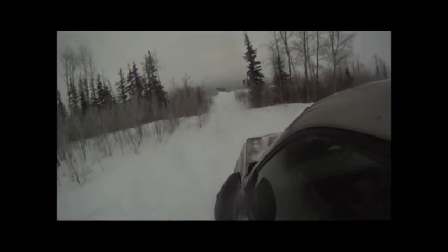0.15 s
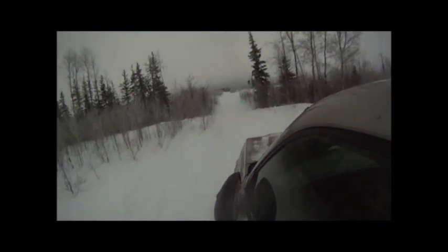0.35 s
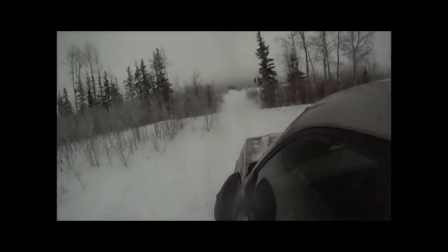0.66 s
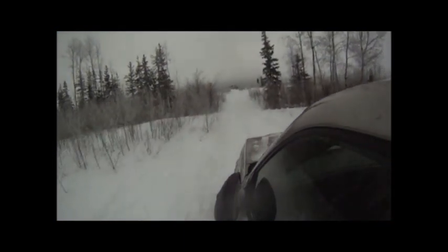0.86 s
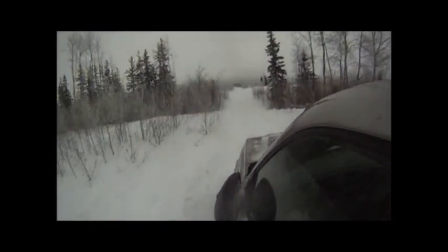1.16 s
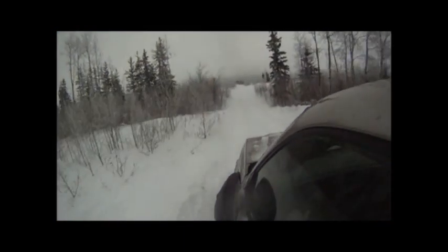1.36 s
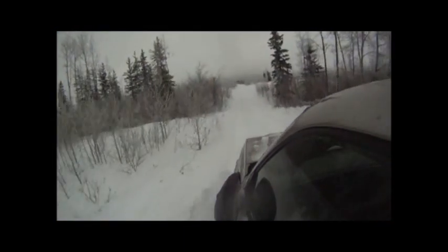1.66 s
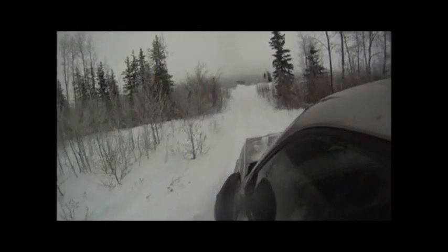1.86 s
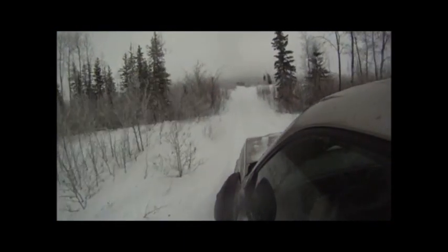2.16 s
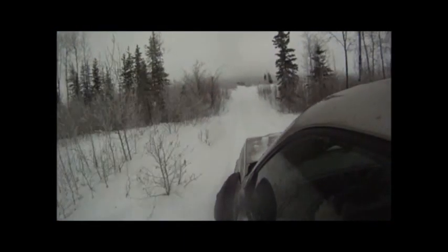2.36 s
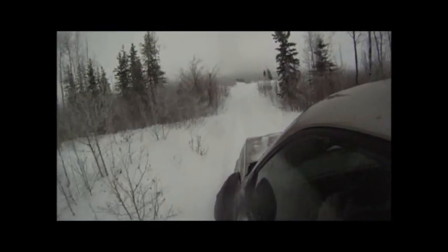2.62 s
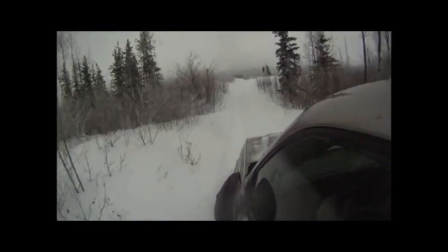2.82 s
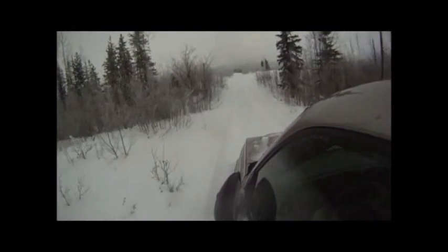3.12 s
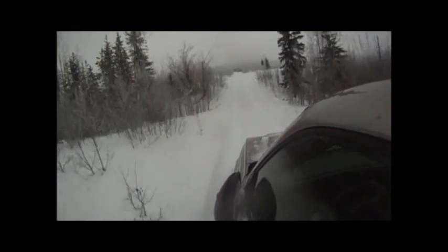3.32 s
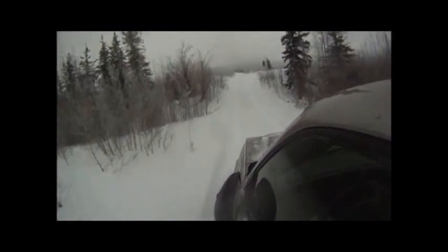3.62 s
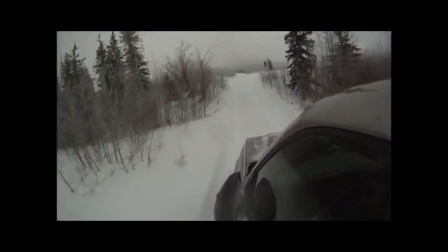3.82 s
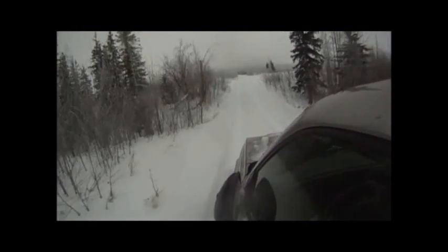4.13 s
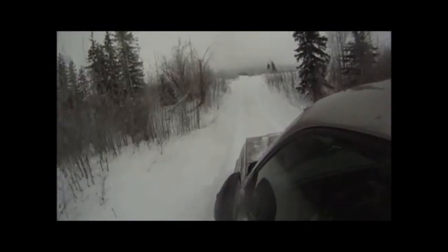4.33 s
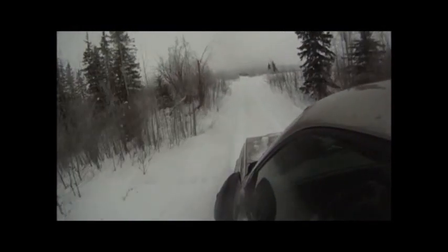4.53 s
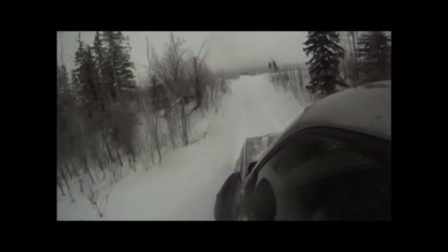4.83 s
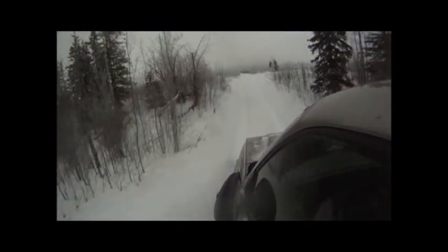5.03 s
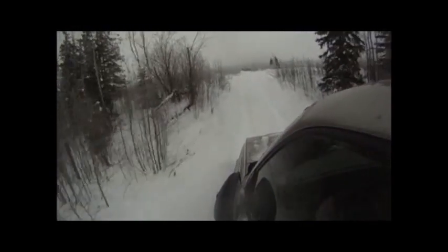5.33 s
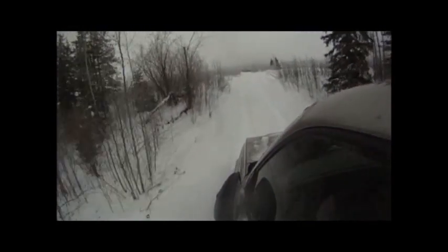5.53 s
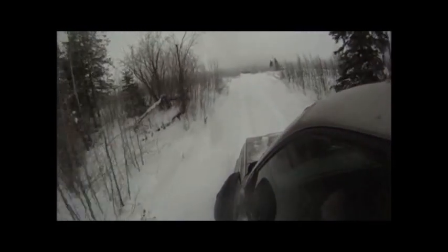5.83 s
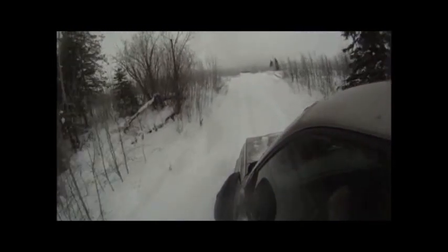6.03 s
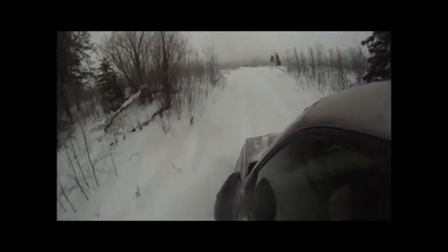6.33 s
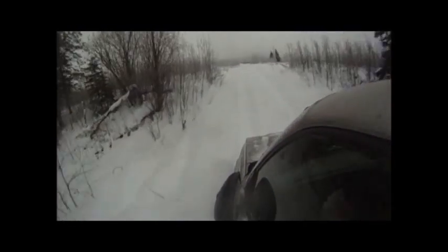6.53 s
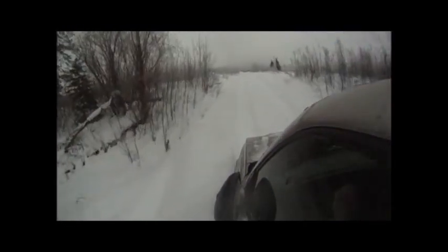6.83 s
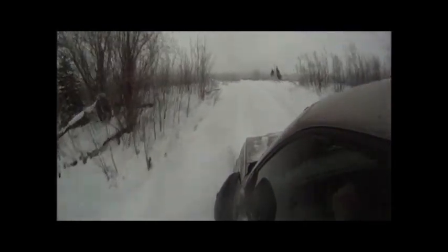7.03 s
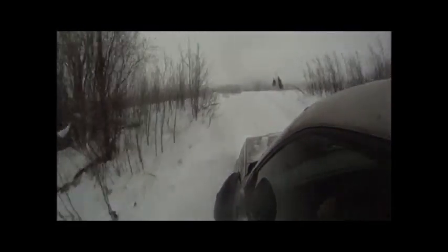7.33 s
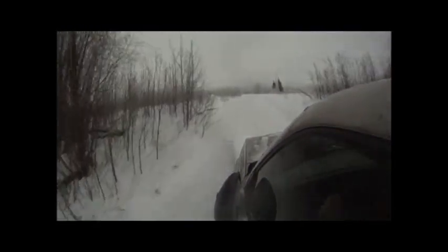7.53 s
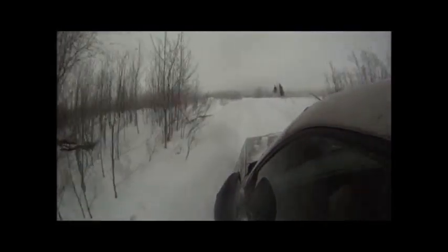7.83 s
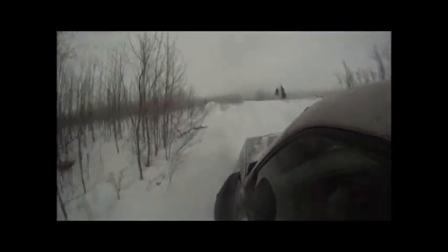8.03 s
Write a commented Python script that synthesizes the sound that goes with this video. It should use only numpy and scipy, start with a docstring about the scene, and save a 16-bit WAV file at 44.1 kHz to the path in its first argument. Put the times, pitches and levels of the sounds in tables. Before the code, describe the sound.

A tracked pickup rumbles through snow with a low pulsing drone, light clicks and wiper knocks, and bursts of close plastic rattling.

```python
"""A pickup on rubber tracks drives along a snowy trail, heard from a closed camera case on its side.
From the start the track lugs drum at a rate that follows the speed, the body rumbles, snow hisses and
crunches, and the drive whines faintly. Until 3.5 s the wipers knock through three sweeps, among sharp
clicks and short pings; then a loose part pings. After 6 s a wheel squeals thinly twice. Bumps set the
case buzzing in its mount along the way, hardest after 7 s, as the truck reaches its highest speed."""
import sys
import numpy as np
from scipy import signal
from scipy.fft import rfft, irfft, next_fast_len
from scipy.io import wavfile

SR = 44100
rng = np.random.default_rng(int(sys.argv[2]) if len(sys.argv) > 2 else 0)


def store_pcm(level_fs):
    """Save levels as 16-bit WAV."""
    pcm = np.round(np.clip(level_fs, -1, 1) * 32767).astype(np.int16)
    wavfile.write(sys.argv[1], SR, np.atleast_2d(pcm).T)


N = 360297

# roughness of the ride: t/s, then relative level/dB of chassis rumble, panel boom and snow hiss
RIDE = [(0, -36, -47.5, -62.5), (.45, -43, -44, -64.5), (1.0, -39.5, -43.5, -61.5),
        (1.3, -36.5, -43.5, -63), (1.7, -39.5, -46, -64), (2.2, -37.5, -43, -63), (3.05, -40, -46.5, -64.5),
        (3.4, -40.5, -43.5, -61.5), (4.3, -39.5, -40.5, -61.5), (5.1, -44.5, -42, -63),
        (5.65, -42, -40, -62), (6.1, -45.5, -42.5, -62), (6.6, -36, -45, -61.5), (7.2, -39.5, -46, -60),
        (7.8, -35.5, -41.5, -57.4), (8.17, -37.5, -44, -59)]
# bumps that set the case buzzing: start t/s, duration/s (0 is one throw), tick level/dB
BUMPS = [(.04, 0.014, -51.5), (.0994, 0, -44), (.1395, 0.017, -53), (0.9667, 0.013, -38.5),
         (1.031, 0.052, -40.5), (1.0633, 0.082, -37), (1.1455, 0.0068, -36), (1.1914, 0.022, -41),
         (2.181, 0.1, -48.5), (2.2954, 0, -53), (3.421, .04, -55), (3.5541, 0.098, -47.5),
         (3.879, .16, -53.5), (4.278, 0.013, -44), (4.349, 0.16, -47.5), (4.5439, 0.013, -52),
         (6.4663, 0.0012, -53), (7.1645, 0.014, -31), (7.2112, 0.0071, -32), (7.391, 0.015, -46),
         (7.4138, .015, -40.5), (7.445, 0.014, -32), (7.462, 0.018, -40), (7.528, 0.0025, -33.5),
         (7.538, 0.021, -39.5), (7.572, 0.026, -40), (7.608, 0.022, -36.5), (7.646, .05, -33),
         (7.7362, 0.011, -39), (7.762, 0.068, -42), (7.8125, 0.07, -33.5), (7.9209, 0.0028, -35),
         (8.0339, 0.0094, -42)]


def from_db(db):
    """Amplitude ratio of a level in decibels."""
    return 10 ** (np.asarray(db) / 20)


def rms_one(x):
    """Normalisation to unit rms."""
    return x / np.sqrt(np.mean(x ** 2) + 1e-20)


def in_time(rows):
    """Linear interpolation of each column after t/s, sample by sample."""
    s, *columns = np.transpose(rows)
    return [np.interp(np.arange(N) / SR, s, c) for c in columns]


def swell_db(start, length, rise_db_per_s, fall_db_per_s):
    """Exponential growth to 0 dB at the start, a hold, then exponential decay."""
    end = start + max(length, 0)
    return np.interp(np.arange(N) / SR, [start - 10, start, end, end + 10],
                     [-10 * rise_db_per_s, 0, 0, -10 * fall_db_per_s])


def drift(rate_hz):
    """Random modulation: low-pass noise of unit rms."""
    r = np.exp(-80 * np.pi * rate_hz / SR)
    slow = signal.lfilter([1], [1, -2 * r, r * r], rng.standard_normal(N // 40 + 2002))[2000:]
    return np.interp(np.arange(N) / 40, np.arange(len(slow)), rms_one(slow))


def unsteady_tone(hz, db, jitter, waver_db):
    """A sinusoid under random frequency and amplitude modulation."""
    phase = 2 * np.pi * np.cumsum(hz * (1 + jitter * drift(59.5))) / SR
    return from_db(db + waver_db * drift(16)) * np.sin(phase)


def coloured(x, gain_at):
    """Spectral shaping by a gain that depends on frequency; unit rms."""
    size = next_fast_len(N)
    hz = np.maximum(np.arange(size // 2 + 1) * SR / size, 1)
    return rms_one(irfft(rfft(x, size) * gain_at(hz), size)[:N])


def bell(hz, centre_hz, half_width_hz):
    """A resonance curve of height 1."""
    return 1 / (1 + ((hz - centre_hz) / half_width_hz) ** 2)


def ring(force, hz, t60):
    """A damped oscillator: a unit impulse starts a sine that loses 60 dB in t60 seconds."""
    r, w = from_db(-60 / (t60 * SR)), 2 * np.pi * hz / SR
    return signal.lfilter([0, np.sin(w)], [1, -2 * r * np.cos(w), r * r], force + 1e-18)


def clicks(rows):
    """Impulsive forces, one for each row of t/s, level/dB."""
    force = np.zeros(N)
    for s, db in rows:
        force[int(np.clip(s * SR, 0, N - 1))] += from_db(db)
    return force


def grains(per_s, spread_db):
    """Shot noise: random impulses of uneven size; unit rms."""
    sizes = from_db(spread_db * np.minimum(rng.exponential(1, N), 3)) * rng.choice([-1, 1], N)
    return rms_one(sizes * (rng.random(N) < per_s / SR))


def scuffed(hits, t60, share):
    """Contact noise: each impulse trails an exponentially dying scuff."""
    r = from_db(-120 / (t60 * SR))
    power = signal.lfilter([1 - r], [1, -r], hits ** 2 + 1e-24)
    return hits + share * np.sqrt(power) * rng.standard_normal(N)


def struck(rows, hz, t60):
    """Hard impact: a ringing mode and a heavily damped, hence broadband, crack."""
    force = scuffed(clicks(rows), t60=0.035, share=0.73)
    return ring(force, hz, t60) + from_db(-3) * ring(force, hz, t60=0.0019)


def case_db(hz):
    """Transmission through the case: its resonances lift narrow bands."""
    # resonances of the case: f/Hz, full width/Hz, gain/dB
    resonances = [(432, 72, 5.5), (762, 40, 5.5), (1074, 32, 6.5), (1302, 165, 6.5), (1670, 52, 4.5),
                  (2023, 48, 5.5), (2640, 95, 5), (3590, 90, 5.5), (3930, 110, 4.5)]
    return sum(db * bell(hz, f, width / 2) for f, width, db in resonances)


def snow():
    """Granular noise: packed snow gives way in countless grains and a few coarser crumbs."""
    # spectrum of snow under the tracks: f/Hz, relative spectral level/dB
    spectrum = [(150, -3), (220, 4), (300, 2.5), (380, -3), (440, -5), (510, -4), (700, -2.5), (900, -8.5),
                (1500, -9.5), (1800, -10), (2220, -2), (2480, -13.5), (2850, -13.5), (3150, -9.5),
                (3500, -12), (4200, -17), (5700, -20.5)]
    points_hz, points_db = np.transpose(spectrum)
    snow_db = lambda hz: np.interp(np.log(hz), np.log(points_hz), points_db, left=-25)
    crush = rng.standard_normal(N) + 0.43 * grains(per_s=500, spread_db=1.5)
    crumbs = 0.17 * grains(per_s=27, spread_db=3)
    _, _, hiss_db = in_time(RIDE)
    envelope = from_db(hiss_db + 3.5 + drift(23))
    return envelope * coloured(crush + crumbs, lambda hz: from_db(snow_db(hz) + case_db(hz)))


def squeals():
    """Friction tone: a wheel squeals on the rubber, creeping up in pitch as it swells and lets go."""
    # peaks of the squeals: t/s, level/dB
    peaks = [(6.26, -68.5), (7.091, -68.5)]
    peak_hz, glide_hz_per_s = 5050, 280
    sound = np.zeros(N)
    for s, db in peaks:
        hz = peak_hz + glide_hz_per_s * (np.arange(N) / SR - s)
        level_db = db + swell_db(s, 0, rise_db_per_s=28, fall_db_per_s=55)
        sound += unsteady_tone(hz, level_db, jitter=0.008, waver_db=1)
    return sound


def drive(lug_hz):
    """Forced vibration: overtones geared to the tracks swell as they cross a resonance of the case."""
    # overtones of the lug beat: multiple of the lug rate, relative level/dB
    orders = [(3, -70), (4, -69), (5, -73.5), (11.1, -81)]
    phase = 2 * np.pi * np.cumsum(lug_hz * (1 + 0.002 * drift(26.8))) / SR
    return sum(from_db(db - 3 + case_db(k * lug_hz) + 4.5 * drift(6.1)) * np.sin(k * phase)
               for k, db in orders)


def engine():
    """Periodic forces of rotating parts: the engine hums and, late in the ride, the gears whine."""
    # hum of the engine: t/s, f/Hz, level/dB
    hum_curve = [(0, 168, -66), (.7, 184.2, -56.5), (1.2, 181, -63), (3.0, 167.6, -55), (4.3, 167.8, -80),
                 (5.4, 164.2, -63), (6.05, 172.3, -48.5), (6.6, 180, -52.5), (7.0, 186.6, -63.5),
                 (8.17, 192, -58)]
    # whine of the gears: t/s, f/Hz, level/dB
    whine_curve = [(5.4, 998, -86), (5.8, 1024, -72), (6.2, 1075, -70), (6.6, 1102, -74), (6.85, 1140, -92),
                   (7.1, 1255, -72), (7.35, 1272, -68), (8.17, 1280, -69.5)]
    hum = unsteady_tone(*in_time(hum_curve), jitter=0.008, waver_db=2)
    whine = unsteady_tone(*in_time(whine_curve), jitter=0.0042, waver_db=4)
    return hum + whine


def sharp_clicks():
    """Impact sound: sharp clicks and short pings during the wiper sweeps, some as the wipers turn."""
    # clicks and pings: t/s, level/dB, f/Hz, t60/s
    hits = [(.218, -52, 3000, .005), (.412, -62, 2610, 0.065), (.68, -45.5, 2190, 0.0089),
            (1.539, -56, 2636, .02), (2.009, -45, 2550, .008), (2.322, -59, 2100, .013),
            (2.815, -53, 2120, 0.019), (2.902, -51, 2400, 0.0095), (3.334, -53.5, 3056, .015)]
    return sum(struck([(s, db)], hz, t60) for s, db, hz, t60 in hits)


def loose_part():
    """Free vibration: a loose part pings, always at its natural frequency."""
    # hits of the part: t/s, level/dB
    pings = [(3.394, -52), (3.554, -49), (3.603, -52), (3.654, -51.5), (3.808, -52.5), (3.894, -51),
             (5.303, -48.5), (5.391, -54)]
    return struck(pings, hz=1955, t60=0.034)


def wipers():
    """Modal ringing: the arms knock at each turn and the blade flops over; the motor hums, then stops."""
    # main knock of each sweep: t/s, level/dB
    sweeps = [(.145, -44.5), (1.476, -44), (2.803, -45)]
    # knocks of one sweep, relative to the main knock: t/s, level/dB
    knocks = [(-.14, -7.5), (0, 0.5), (0.516, -10)]
    # modes of the arms: f/Hz, gain/dB, t60/s
    modes = [(334, -7, 0.094), (596, -3.5, 0.034), (645, -6, 0.04), (747, -15, 0.06), (1040, -11, 0.07)]
    # hum of the wiper motor: t/s, level/dB
    motor_curve = [(0, -73), (.85, -62), (1.7, -68), (2.3, -70), (3.35, -72), (3.6, -100)]
    flop_delay_s, flop_loss_db = 0.007, 3
    turns = [(s + after, db + offset_db) for s, db in sweeps for after, offset_db in knocks]
    flops = [(s + flop_delay_s, db - flop_loss_db) for s, db in turns]
    force = scuffed(clicks(turns + flops), t60=0.063, share=0.95)
    arms = sum(from_db(db) * ring(force, hz, t60) for hz, db, t60 in modes)
    return arms + unsteady_tone(308.8, *in_time(motor_curve), jitter=0.0397, waver_db=0)


def throws(lug_hz):
    """Inelastic impacts: during a bump each lug throws the case against its mount, where it bounces."""
    bounce_s, bounce_loss_db = 0.0042, 3.5
    jitter_s, spread_db, most_throws = 0.001, 3.36, 16
    contacts = []
    for start, length, db in BUMPS:
        period = 1 / lug_hz[int(start * SR)]
        late, loud = rng.standard_normal((2, most_throws, 2))
        late[0, 0] = loud[0, 0] = 0  # only the later contacts are uneven
        for i in range(most_throws):
            if i * period > length:
                break
            for bounce in (0, 1):
                s = start + i * period + bounce * bounce_s + jitter_s * late[i, bounce]
                contacts.append((s, db - bounce * bounce_loss_db + spread_db * loud[i, bounce]))
    return clicks(contacts)


def case_rattle(lug_hz):
    """Contact rattle: hard plastic ticks ring the damped mount, with a fine chatter between them."""
    # modes of the mount: f/Hz, gain/dB, t60/s
    modes = [(1341.8, -21.5, 0.01), (1984, -9, 0.0093), (2223, -11.5, 0.0092), (3060, -5, 0.0016),
             (3580, -6.5, 0.0061), (4280, -8.5, 0.0041), (5250, -3, 0.0041)]
    chatter_db, below_ticks_db = -88.5, 32  # the chatter at rest, and its margin during a bump
    for s, length, db in BUMPS:
        bump_db = db + swell_db(s, length, rise_db_per_s=900, fall_db_per_s=350)
        chatter_db = np.maximum(chatter_db, bump_db - below_ticks_db)
    chatter = from_db(chatter_db) * grains(per_s=300, spread_db=3.5)
    ticks = from_db(0.24) * throws(lug_hz)
    force = scuffed(ticks + chatter, t60=0.0055, share=0.72)
    return sum((-1) ** k * from_db(db) * ring(force, hz, t60) for k, (hz, db, t60) in enumerate(modes))


def shaken(level_db, modes, cutoff_hz=195):
    """Resonant response to a random force; the heavy body follows only the slow part of it."""
    resonance = lambda hz: sum(from_db(db) * bell(hz, f, width) for f, width, db in modes)
    response = lambda hz: resonance(hz) / (1 + (hz / cutoff_hz) ** 12)
    return from_db(level_db) * coloured(rng.standard_normal(N), response)


def rumble():
    """Structure-borne sound: uneven ground shakes the chassis and the body panels."""
    # resonances of the chassis: f/Hz, half width/Hz, gain/dB
    chassis = [(29.6, 6.2, -4), (39.3, 5.6, -4), (65.3, 5.8, -5), (93.7, 10.2, 0.5)]
    # resonances of the panels: f/Hz, half width/Hz, gain/dB
    panels = [(139.84, 7.8, 1.5), (170, 22, -16.5)]
    chassis_db, panels_db, _ = in_time(RIDE)
    return shaken(chassis_db, chassis) + shaken(panels_db, panels)


def tracks(lug_hz, waver_db=2.5, slip_rad=0.15):
    """Periodic forcing: lugs meet the wheels in a steady beat; the belts flap, more so at speed."""
    # fundamental of the lug beat: t/s, relative level/dB
    beat_curve = [(0, -37), (.25, -39), (.37, -28), (.6, -36.5), (1.4, -52), (1.95, -47), (2.58, -35.5),
                  (2.78, -65), (3.25, -43), (3.42, -28), (4.4, -32.5), (4.85, -41), (5.1, -33),
                  (5.4, -39.5), (6.9, -39), (7.49, -29), (7.6, -37.5), (8.17, -47)]
    # its second harmonic: t/s, relative level/dB
    octave_curve = [(0, -46.5), (.5, -41), (.9, -30), (1.14, -20), (1.27, -42.5), (1.69, -41.5),
                    (1.77, -27.5), (1.88, -40), (2.6, -38), (2.8, -55), (3.7, -46), (4.35, -38),
                    (5.15, -39), (5.4, -58), (5.93, -34.5), (6.6, -43), (7.4, -55), (8.17, -48)]
    beat_db, = in_time(beat_curve)
    octave_db, = in_time(octave_curve)
    flap = 0.094 * (lug_hz / 65) ** 2  # depth of the noisy sidebands
    phase = 2 * np.pi * np.cumsum(lug_hz) / SR + slip_rad * drift(1.2)
    beat_gain = from_db(beat_db + 3 + waver_db * drift(11))
    beat = np.sin(phase) + flap * drift(17) * np.cos(phase)
    octave_gain = from_db(octave_db + 0.5 + waver_db * drift(5.3))
    octave = np.sin(2 * phase) + flap * drift(21) * np.cos(2 * phase)
    return beat_gain * beat + octave_gain * octave


def scene():
    """Superposition: all sources add at the one microphone in the case."""
    # speed of the tracks as a lug rate: t/s, f/Hz
    speed = [(0, 34.4), (.38, 43.5), (.75, 44.7), (1.5, 52.8), (2.0, 48.5), (2.5, 50.7), (3.25, 58.2),
             (4.0, 63.4), (4.4, 67.3), (5.65, 65), (6.5, 70.7), (7.5, 85.8), (8.17, 84.4)]
    lug_hz, = in_time(speed)
    machinery = tracks(lug_hz) + drive(lug_hz) + squeals() + engine()
    shaking = rumble() + case_rattle(lug_hz) + loose_part()
    return (machinery + shaking + snow() + wipers() + sharp_clicks())[None]


def record(dry):
    """Spectral imaging: the camera samples slowly and holds each value, so the rumble sings at 12 kHz."""
    band_edge_hz, hold_hz, cutoff_hz = 5650, 12000, 12800
    narrow = signal.sosfilt(signal.cheby1(10, .3, band_edge_hz, fs=SR, output="sos"), dry)
    sampled = signal.resample_poly(narrow, hold_hz, SR, axis=-1, window=("kaiser", 3))
    held = np.repeat(sampled, 4, axis=-1)
    wide = signal.resample_poly(held, SR, 4 * hold_hz, axis=-1)
    return signal.sosfilt(signal.ellip(12, .1, 80, cutoff_hz, fs=SR, output="sos"), wide)


dry = scene()
out = record(dry)
store_pcm(out)
```